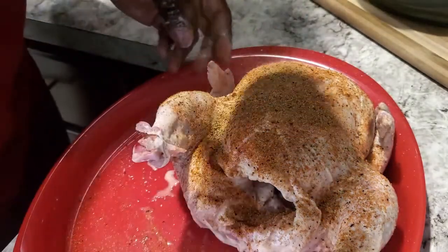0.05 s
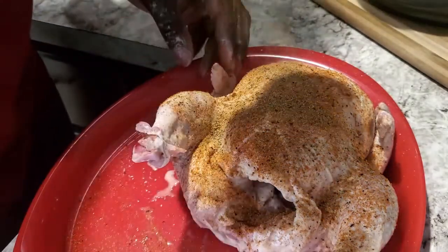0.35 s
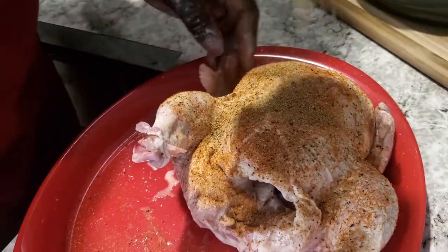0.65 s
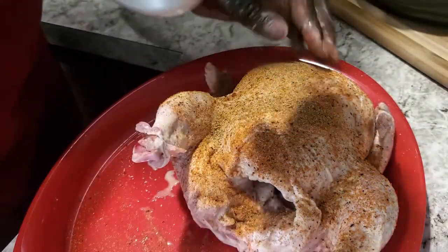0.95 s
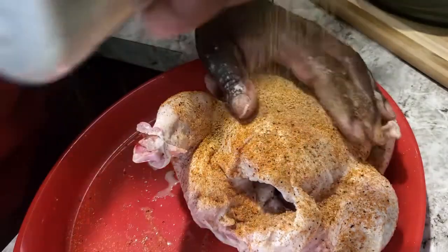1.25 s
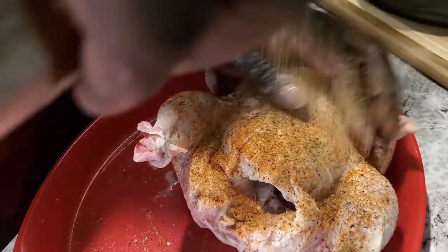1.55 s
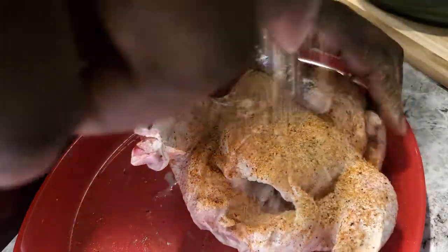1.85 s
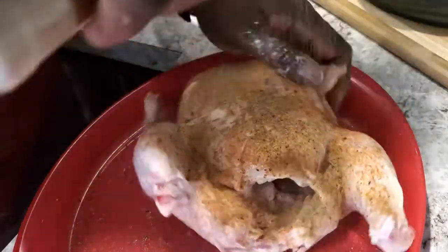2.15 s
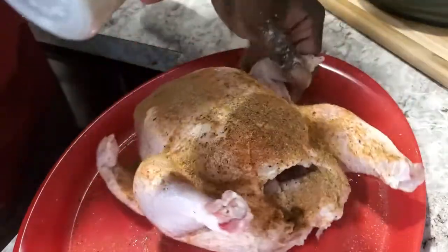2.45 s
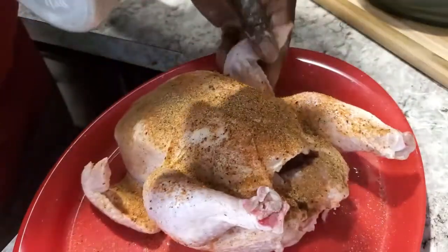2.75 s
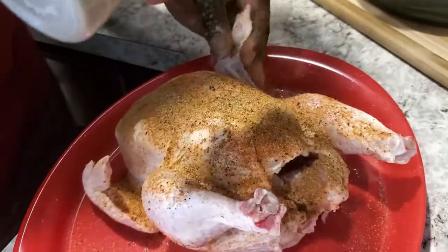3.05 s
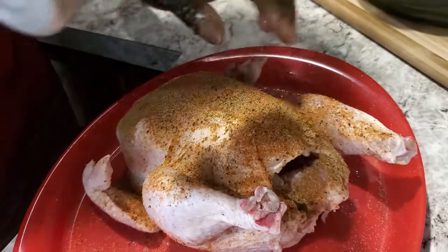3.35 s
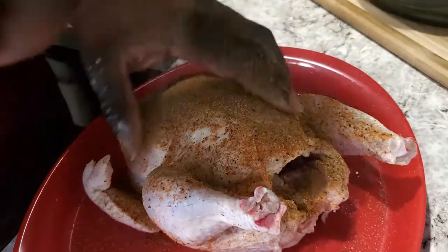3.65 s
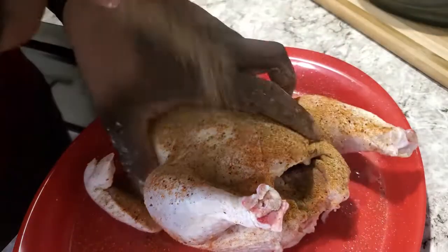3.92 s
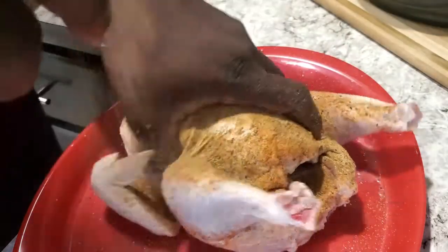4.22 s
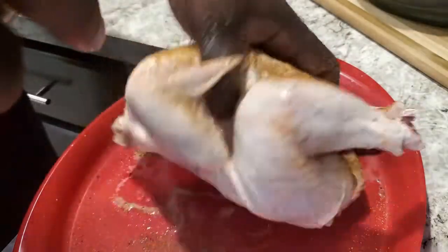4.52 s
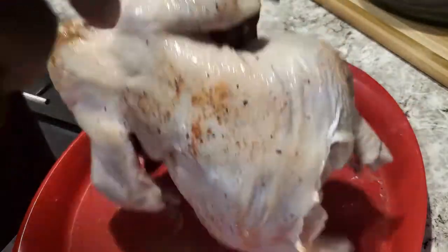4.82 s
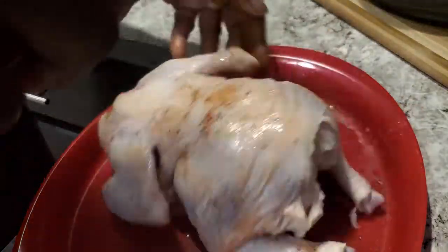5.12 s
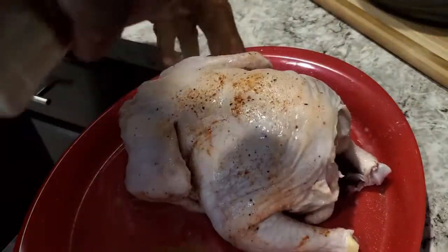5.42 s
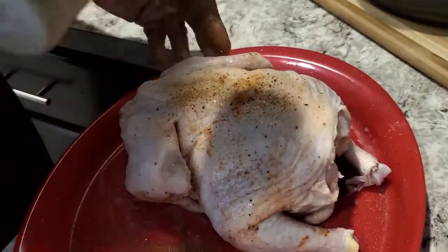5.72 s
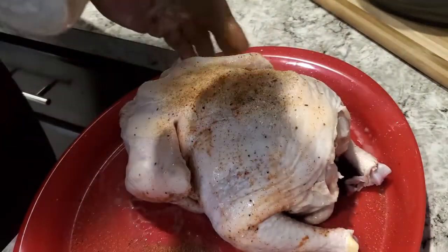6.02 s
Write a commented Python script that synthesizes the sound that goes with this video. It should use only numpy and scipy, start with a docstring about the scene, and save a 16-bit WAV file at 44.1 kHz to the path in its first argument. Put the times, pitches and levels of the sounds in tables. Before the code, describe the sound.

Seasoning patters faintly and sticky skin crackles as a raw chicken is handled and flipped with a clatter on a plastic plate.

```python
"""In a kitchen, a raw chicken is seasoned and handled on a plastic plate, close by, while a fan drones.
Falling grains patter; the wet skin crackles and snaps as it peels from the fingers, and juice smacks.
Nudged and dragged, the bird rubs and squeaks by stick-slip friction. When it is turned over,
the plate clatters on the counter and the flesh lands in soft thuds that excite the plate's low modes."""
import sys
import numpy as np
from scipy import signal
from scipy.fft import rfft, irfft, next_fast_len
from scipy.io import wavfile
from scipy.ndimage import map_coordinates

SR = 44100
rng = np.random.default_rng(int(sys.argv[2]) if len(sys.argv) > 2 else 0)


def unload_wav(signal):
    """Save mono or channel-first audio to the path in sys.argv[1] as 16-bit WAV at rate SR, clipped to [-1, 1]."""
    wavfile.write(
        sys.argv[1],
        SR,
        np.round(np.clip(np.atleast_2d(signal).T, -1, 1) * 32767).astype(np.int16),
    )


N = 276616

# spectra of fine, crisp ticks and of coarser, wet ones: (frequency [Hz], relative level [dB])
CRACKLE_SPECTRUM = [(3000, -55), (7000, -28), (9000, -17), (11000, -4.5), (13000, -1.5), (14800, -0.5),
                    (15600, 1.5)]
SQUELCH_SPECTRUM = [(600, -30.5), (1200, -10.5), (2000, -6.5), (2900, -14), (3800, -5), (4600, -3),
                    (5300, -6), (6300, 3), (7400, 5.5), (8600, 0.5), (12000, 2.5)]


def amp(db):
    """Decibels to amplitude gain."""
    return 10 ** (np.asarray(db) / 20)


def unit(x):
    """x normalised to rms 1."""
    return x / np.sqrt(np.mean(x ** 2) + 1e-20)


def along(points, hz):
    """Interpolation of (frequency [Hz], value) points on a log frequency axis."""
    f, v = np.transpose(points)
    return np.interp(np.log(hz + 1), np.log(f + 1), v)


def wobble(rate):
    """Smooth random modulation, with rate knots a second."""
    return map_coordinates(rng.standard_normal(int(N * rate / SR) + 4), [np.arange(N) * rate / SR])


def filtered(x, response):
    """Zero-phase filtering: the spectrum of x times a frequency response."""
    size = next_fast_len(N + SR // 2)
    return irfft(rfft(x, size) * response(np.fft.rfftfreq(size, 1 / SR)), size)[..., :N]


def coloured(x, spectrum, size=4096):
    """Minimum-phase filtering: folding the cepstrum gives a causal response with this spectrum."""
    cepstrum = irfft(np.log(amp(along(spectrum, np.fft.rfftfreq(size, 1 / SR)))))
    cepstrum[1:size // 2] *= 2
    cepstrum[size // 2 + 1:] = 0
    return signal.fftconvolve(x, irfft(np.exp(rfft(cepstrum)))[None], axes=1)[:, :x.shape[1]]


def shifting(x, depth_db, width_hz, hold_s):
    """Spectral modulation: the colour of x drifts at random."""
    hz, t, spectra = signal.stft(x, SR, nperseg=256)
    place = np.array(np.meshgrid(hz / width_hz, t / hold_s, indexing="ij"))
    drift = map_coordinates(rng.standard_normal((128, 640)), place)
    return signal.istft(spectra * amp(depth_db * drift), SR, nperseg=256)[1][:, :N]


def pan(db):
    """Left and right gains for a level difference."""
    return amp(np.array([[db], [-db]]) / 2)


def add(track, s, sound):
    """Superpose a sound on the track at s seconds."""
    part = track[:, round(s * SR):][:, :sound.shape[-1]]
    part += sound[..., :part.shape[1]]


def ring(modes, t, ratio, scatter_db):
    """Free vibration: damped modes whose strengths vary with each blow and each channel."""
    scatter = lambda: scatter_db * (rng.standard_normal() + rng.standard_normal((2, 1))) / 2
    return sum(amp(db + scatter() - 60 * t / t60) * np.sin(2 * np.pi * hz * ratio * t)
               for hz, db, t60 in modes)


def grains(rate, spread_db, clump_db):
    """Shot noise: impulses of random size, in clumps, at rms 1."""
    size = amp(spread_db * np.minimum(rng.exponential(size=N), 4) + clump_db * wobble(70))
    return unit((rng.random(N) < rate / SR) * size * rng.standard_normal((2, N)))


def stroke(s, length, attack_s, slope_db_per_s, release_t60):
    """Envelope of a hand movement: a linear rise, a gentle slope, then exponential decay."""
    t = np.maximum(np.arange(N) / SR - s, 0)
    release_db = -60 * np.maximum(t - length, 0) / release_t60
    return np.minimum(t / attack_s, 1) * amp(slope_db_per_s * t + release_db)


def kitchen(x, wet_db):
    """Reverberation: counter and walls add a diffuse tail whose treble dies first."""
    # room decay: (frequency [Hz], t60 [s])
    decay = [(120, 0.41), (400, 0.27), (1500, 0.26), (5000, 0.24), (15000, 0.15)]
    hz, t, spectra = signal.stft(rng.standard_normal((2, SR // 2)), SR, nperseg=256)
    tail = signal.istft(spectra * amp(-60 * t / along(decay, hz)[:, None]), SR, nperseg=256)[1]
    tail *= 1 - np.exp(-np.arange(tail.shape[1]) / SR / 0.0042)
    return x + amp(wet_db) * signal.fftconvolve(x, tail / np.linalg.norm(tail[0]), axes=1)[:, :N]


def fan():
    """Flow noise: a low rush of air, partly coherent between channels, with phase-modulated tones."""
    # air spectrum and hum tones: (frequency [Hz], relative level [dB])
    air = [(20, -15), (65, -3.5), (140, -9.5), (188, -3.5), (260, -8.5), (360, -4), (480, -10),
           (640, -18.5), (740, -16), (850, -24), (1200, -36), (2300, -37.5), (9000, -55.5), (16000, -54)]
    hum = [(75.4, -77.5), (118.4, -71), (183.0, -73.5), (312.2, -76), (506.0, -77.5), (737.5, -73.5)]
    # likeness of left and right: (frequency [Hz], correlation [-1..1])
    correlation = [(60, .8), (130, .76), (290, -.1), (640, .4), (1400, 0)]
    angle = lambda hz: np.arccos(np.clip(along(correlation, hz), -1, 1)) / 2
    response = lambda hz: amp(along(air, hz)) * [np.cos(angle(hz)), np.sin(angle(hz))]
    mid, side = filtered(rng.standard_normal((2, N)), response)
    t = np.arange(N) / SR
    tones = sum(amp(db) * np.sin(2 * np.pi * hz * t + 1.29 * wobble(8.6)) for hz, db in hum)
    return amp(-60.5) * unit(np.array([mid + side, mid - side])) + amp(2.5) * tones


def rim_taps():
    """Modal excitation: fingertips brush the rim and set it ringing faintly."""
    # touches: (time [s], peak level [dB])
    touches = [(5.915, -72.5), (6.008, -66.5), (6.03, -71), (6.178, -69.5)]
    # rim modes: (nominal frequency [Hz], relative level [dB], t60 [s])
    modes = [(2110, -10, 0.031), (2280, 2, 0.038), (2960, -12.5, .08), (3740, -9, 0.053)]
    out, t = np.zeros((2, N)), np.arange(SR // 6) / SR
    contact_s = 0.0036
    for s, db in touches:
        force = unit(rng.standard_normal((1, len(t)))) * t / contact_s * np.exp(-t / contact_s)
        rim = signal.fftconvolve(ring(modes, t, ratio=0.99, scatter_db=8), force, axes=1)[:, :len(t)]
        add(out, s, amp(db) * rim / abs(rim).max())
    return kitchen(out, wet_db=-2.5)


def seasoning():
    """Random impacts: many fine grains and a few coarse ones patter on skin and plate."""
    # flow of seasoning: (time [s], level [dB])
    flow = [(0, -55.5), (.2, -53.5), (.72, -60), (1.1, -65), (1.5, -56.5), (2.0, -49.5), (2.3, -57),
            (2.55, -60), (3.1, -60), (3.65, -64), (4.05, -58.5), (4.45, -51.5), (4.8, -56.5), (5.2, -56.5),
            (5.45, -80.5), (5.95, -72.5), (6.25, -63.5)]
    gain = amp(np.interp(np.arange(N) / SR, *np.transpose(flow)))
    ticks = grains(rate=510, spread_db=2.5, clump_db=6.0)
    patter = unit(coloured(ticks, CRACKLE_SPECTRUM))
    patter += amp(-16.5) * unit(coloured(ticks, SQUELCH_SPECTRUM))
    return kitchen(patter * gain, wet_db=2.5)


def handling():
    """Envelopes of crackle and squelch: the strongest press rules, over a faint resting level."""
    # finger presses: (time [s], duration [s], relative crackle level [dB], squelch offset [dB])
    presses = [(0.039, .09, -50.5, -7), (0.163, .18, -53, -4.5), (0.396, 0.074, -50.5, -8),
               (0.55, 0.24, -53.5, -9), (.76, 0.043, -53.5, -6.5), (0.905, 0.1, -54.5, -6),
               (1.104, 0.042, -54.5, -13.5), (1.249, 0.2, -56, -13), (1.5, 0.44, -60.5, -12),
               (1.902, 0.16, -55, -7.5), (2.094, 0.13, -51.5, -8.5), (2.26, 0.1, -55, -10),
               (2.791, 0.12, -57, -16.5), (2.98, 0.03, -55, -15), (3.12, 0.066, -59.5, -11),
               (3.785, .09, -59, -11.5), (3.863, 0.14, -58.5, -5), (4.103, 0.1, -51, -9),
               (4.25, 0.42, -50, -6.5), (4.719, 0.27, -52, -17), (4.876, 0.067, -45.5, -7.5),
               (4.924, 0.033, -38, -6.5), (5.132, .11, -49.5, -9), (5.996, 0.14, -59, -17)]
    held_db, lying_db, let_go_s = -67, -71, 4.6
    crackle = amp(np.where(np.arange(N) / SR < let_go_s, held_db, lying_db))
    squelch = crackle * amp(-33.5)
    for s, length, db, squelch_db in presses:
        press = amp(db) * stroke(s, length, attack_s=0.0063, slope_db_per_s=-13, release_t60=0.25)
        crackle = np.maximum(crackle, press)
        squelch = np.maximum(squelch, press * amp(squelch_db))
    return crackle, squelch


def wet_skin(crackle_gain, squelch_gain):
    """Adhesion: skin sticks and parts in a crackle, over a squelch of pockets opening and closing."""
    ruptures = grains(rate=3800, spread_db=1.0, clump_db=6.0)
    crackle = unit(coloured(ruptures, CRACKLE_SPECTRUM)) * crackle_gain * amp(4.5)
    pockets = coloured(grains(rate=1500, spread_db=1.0, clump_db=1.5), SQUELCH_SPECTRUM)
    squelch = unit(shifting(pockets, depth_db=2.5, width_hz=560, hold_s=0.034)) * squelch_gain
    return kitchen(crackle + squelch, wet_db=-1.5)


def smacks():
    """Squeeze flow: flesh expels air and juice in a dying spray, band-filtered by the gap."""
    # squeezes: (time [s], level [dB], gap pitch [Hz], t60 [s])
    squeezes = [(0.084, -69, 2200, 0.19), (0.171, -62.5, 1400, 0.058), (.26, -70, 2040, 0.13),
                (1.27, -73.5, 2700, 0.28), (1.791, -65.5, 1590, 0.1), (2.307, -57.5, 4400, 0.052),
                (2.34, -55, 3600, 0.033), (2.4, -52.5, 2800, 0.056), (2.991, -70, 1460, .15),
                (3.188, -75, 4200, 0.052), (3.878, -53.5, 4170, 0.068), (4.284, -56, 3800, 0.37),
                (4.33, -60, 830, 0.072), (4.363, -55, 1540, 0.043), (4.368, -51.5, 3570, .05),
                (4.46, -53.5, 2900, 0.091), (4.51, -62.5, 4200, 0.49), (4.781, -52.5, 4240, 0.026),
                (4.821, -66.5, 4400, 0.25), (4.897, -41, 1103, 0.28), (4.922, -37, 3306, 0.073),
                (4.9403, -25.5, 3000, 0.041), (4.951, -32.5, 1550, 0.062), (4.9425, -29, 4100, 0.044),
                (4.976, -37.5, 3820, 0.045), (5.115, -49, 2000, 0.053), (5.134, -29.5, 560, 0.045),
                (5.151, -38, 2850, 0.032)]
    out, t = np.zeros((2, N)), np.arange(SR // 5) / SR
    spray = grains(rate=6300, spread_db=-2.5, clump_db=-1.5)
    for s, db, hz, t60 in squeezes:
        gap = signal.butter(1, [hz / 1.27, hz * 1.145], "band", fs=SR)
        start = rng.integers(N - len(t))
        splash = signal.lfilter(*gap, signal.lfilter(*gap, spray[:, start:start + len(t)]))
        swell = 1 - np.exp(-t / (0.024 * t60))  # a slower squeeze starts more softly
        add(out, s, unit(splash) * swell * amp(db - 60 * t / t60))
    return kitchen(out, wet_db=-3.5)


def drag():
    """Stick-slip friction: the sliding bird rubs, rumbles the plate and squeaks briefly."""
    # shoves: (time [s], duration [s], relative rub level [dB], relative rumble level [dB])
    shoves = [(1.916, 0.26, -65.5, -59), (4.124, 0.043, -70, -55.5), (4.279, 0.088, -60.5, -54),
              (4.423, .25, -66.5, -55), (4.7, 0.21, -68, -56.5), (4.878, 0.039, -49, -44)]
    # friction spectra: (frequency [Hz], relative level [dB])
    rub_spectrum = [(200, -2.5), (400, 6.5), (700, 6), (1100, -4), (1600, -5), (2600, -12), (4000, -9.5),
                    (8000, -26.5)]
    rumble_spectrum = [(20, -16), (40, 1), (75, 3), (150, 1), (300, -12.5), (600, -39)]
    # wet skin on plastic: (time [s], level [dB], starting pitch [Hz], duration [s])
    squeaks = [(4.314, -49, 612, .02), (4.326, -48, 670, 0.014), (4.337, -43, 764, 0.0083),
               (4.357, -53, 910, 0.013)]
    rub_gain, rumble_gain = sum(
        amp([[rub_db], [rumble_db]])
        * stroke(s, length, attack_s=0.044, slope_db_per_s=3.5, release_t60=0.33)
        for s, length, rub_db, rumble_db in shoves)
    slips = coloured(grains(rate=1000, spread_db=0.5, clump_db=0.5), rub_spectrum)
    out = unit(shifting(slips, depth_db=5, width_hz=280, hold_s=0.02)) * rub_gain * amp(2.5)
    out += unit(coloured(rng.standard_normal((1, N)), rumble_spectrum)) * rumble_gain * amp(-3.5)
    t = np.arange(SR // 10) / SR
    for s, db, hz, length in squeaks:
        swell = t / length * 4
        pitch = hz * (1 + 0.037 * np.minimum(t / length, 2))
        tone = np.sin(2 * np.pi * np.cumsum(pitch) / SR)
        add(out, s - length / 4, amp(db) * swell * np.exp(1 - swell) * tone)
    return kitchen(out, wet_db=-4.5)


def snaps(crackle_gain):
    """Adhesive failure: patches of skin peel off in bursts, crisp when quick and soft when slow."""
    # patches letting go: (time [s], peak level [dB], body offset [dB], peeling time [s])
    patches = [(.052, -32, -10, 0.00072), (.081, -25, -11.5, 0.0013), (.22, -31, -5.5, 0.00048),
               (.275, -30, -11, .002), (.393, -28, -10.5, 0.00069), (.435, -33.5, -4, 0.0025),
               (.567, -32, -7, 0.00066), (.632, -32, -8.5, 0.0013), (.773, -31, -10, 0.0012),
               (.815, -33.5, -5.5, 0.0025), (.919, -29.5, -11.5, 0.003), (.935, -34, -8, 0.0015),
               (1.026, -37.5, -6, 0.0016), (1.16, -35, -9.5, 0.0027), (1.337, -31.5, -15, 0.0011),
               (1.58, -28, -14.5, 0.0012), (1.8, -31, -12.5, 0.00047), (1.995, -29.5, -8.5, 0.00053),
               (2.109, -19, -12, 0.00076), (2.188, -37.5, 10.5, 0.00066), (2.6763, -20, -15, 0.00057),
               (2.842, -32, -19.5, .0008), (2.868, -36, -14.5, 0.00033), (2.924, -29, -16.5, 0.00038),
               (2.9601, -21.5, -13, 0.00013), (2.99, -31, -5.5, 0.0012), (3.124, -36, -24, 0.00069),
               (3.152, -33, -21.5, .001), (3.202, -31, -16, 0.00056), (3.494, -29, -15.5, .0005),
               (3.567, -34, -16, .0005), (3.7494, -28, -18, 0.00026), (3.881, -26, -10.5, 0.0016),
               (4.081, -28.5, -17.5, 0.00057), (4.2675, -29.5, -10.5, .0015), (4.292, -27.5, -8, .001),
               (4.356, -33.5, -1, 0.0014), (4.52, -30.5, -8.5, 0.0008), (4.607, -32, -9, 0.0013),
               (4.79, -36.5, -7, .002), (4.869, -26, -14, .0007), (4.9424, -15, -13, 0.00063),
               (4.9554, -24, -10.5, 0.0012), (4.9751, -26.5, -11, 0.0017), (5.1334, -23, -14, 0.00063),
               (5.4261, -44, -15.5, .0005), (5.776, -42.5, -19, 0.00048), (5.82, -35, -20, 0.00057),
               (6.143, -39.5, -17, .0007), (6.213, -37, -16, 0.00073)]
    # a snap's lower body: (frequency [Hz], relative level [dB])
    body_spectrum = [(600, -29), (1500, -14.5), (2900, -19), (3800, -12), (5300, -7), (6300, -1), (7500, 2),
                     (8700, 0), (12000, -1.5)]
    out, t = np.zeros((2, N)), np.arange(SR // 20) / SR
    # fainter snaps come at random and grow with the crackle around them
    faint_per_s, faint_body_db, faint_peel_s = 20, -17, 0.00017
    activity = (crackle_gain / np.median(crackle_gain)) ** 0.82
    faint_db = -44 + 20 * np.log10(activity) + 4.5 * rng.standard_normal(N)
    onsets = np.flatnonzero(rng.random(N) < faint_per_s / SR)
    faint = [(i / SR, faint_db[i], faint_body_db, faint_peel_s) for i in onsets]
    tail = amp(-18.5 - 60 * t / 0.024)  # the skin peels a little further
    for s, db, body_db, peel_s in patches + faint:
        peel = t / peel_s * np.exp(1 - t / peel_s) + tail
        burst = rng.standard_normal((2, len(t))) * peel
        high, body = coloured(burst, CRACKLE_SPECTRUM), coloured(burst, body_spectrum)
        snap = high / abs(high).max() + amp(body_db) * body / abs(body).max()
        add(out, s, amp(db) * snap * pan(-0.5 * rng.standard_normal()))
    return kitchen(out, wet_db=-5.0)


def thuds():
    """Mass-loaded vibration: soft, heavy contacts bounce the flexing plate under the bird's weight."""
    # landings: (time [s], peak level [dB], pitch [ratio], contact time [s], damping [ratio])
    landings = [(1.932, -48.5, 1.45, 0.0021, 1.5), (2.101, -40.5, 1.71, 0.0035, 2.8),
                (2.345, -49, 1.48, 0.0052, 0.43), (4.658, -28, 1.034, 0.0078, 0.94),
                (4.705, -43, 2.05, 0.0059, 0.97), (4.9234, -25, 1.42, 0.0018, 1.2),
                (4.947, -24.5, 0.79, 0.0064, 0.96), (4.99, -29.5, 1.17, 0.0034, 1.6),
                (5.1344, -15.5, 1.0, 0.0017, 1.2), (5.175, -28.5, 2.4, 0.0043, 1.4),
                (5.218, -27.5, 1.07, .016, 1.7), (5.266, -37.5, 1.2, 0.014, 2.2)]
    # loaded plate: (nominal frequency [Hz], relative level [dB], nominal t60 [s])
    modes = [(138.4, 2, .16), (189.6, -10.5, 0.15), (251, 1.5, .035), (281, -3, 0.048), (314.6, -2.5, 0.17),
             (364, -3.5, 0.092), (536, -11, 0.16)]
    out, t = np.zeros((2, N)), np.arange(SR // 3) / SR
    low_cut = signal.butter(3, 112, "high", fs=SR)  # a high-pass keeps deep bass out of the thuds
    for s, db, ratio, contact_s, damping in landings:
        force = t * np.exp(-6 * t / contact_s)
        settle = np.exp(-(t * damping / 0.18) ** 2)  # spreading flesh smothers the bounce
        response = ring(modes, t * damping, ratio / damping, scatter_db=1.5) * settle
        bounce = signal.lfilter(*low_cut, signal.fftconvolve(response, force[None], axes=1))
        add(out, s, amp(db) * bounce / abs(bounce).max())
    return kitchen(out, wet_db=-13.0)


def plate_knocks():
    """Hard impact: the plate rocks on the counter, cracking and ringing, duller when flesh cushions it."""
    # blows: (time [s], peak level [dB], cutoff [Hz], hollow pitch [Hz], hollow offset [dB],
    # ring offset [dB], left minus right [dB])
    blows = [(1.926, -46, 2520, 588, -4, -5.5, 5.5), (2.089, -39, 3820, 1150, -14, -5.5, 1.5),
             (2.333, -43.5, 4200, 1140, -9, -6, 2), (2.3405, -30.5, 3500, 1175, -7.5, -28, -2),
             (2.349, -42, 2600, 1060, -11, -20, 2), (2.4, -34, 2080, 610, -9.5, -27, 3),
             (2.402, -38, 1800, 1157, -2, -35, 10), (4.597, -44, 4000, 1371, -22, -4, 6.5),
             (4.658, -43, 1212, 700, -8, -9, 3.5), (4.921, -20, 2623, 652, -11.5, -7.5, -1),
             (4.928, -22, 1533, 591, -10, -10.5, 1), (4.941, -8, 3927, 1417, -7.5, -5.5, -1),
             (4.9477, -19, 3300, 860, -8, -7.5, 3), (4.954, -20.5, 2830, 1408, -7, -9, 8.5),
             (4.967, -27.5, 2006, 373.6, -5, -8, 3.5), (5.133, -18, 1667, 912, -14.5, -16, -4.5),
             (5.1425, -27.5, 1800, 1027, -11, -17, 4), (5.149, -25.5, 1830, 1081, -5.5, -11.5, 7.5),
             (5.2125, -24.5, 2500, 1305, -10, -15.5, 1)]
    # plate modes: (frequency [Hz], relative level [dB], t60 [s])
    modes = [(319, -5, .2), (385, -9, .12), (540, -9, .11), (670, -7, .11), (855, -5, .13), (952, -4, .12),
             (1026, -4, .14), (1168, -7, .09), (1265, -4, .1), (1395, 0, .12), (1485, -2, .1),
             (1560, 0, .12), (1730, -4, .13), (2060, -7, .12), (2290, -4, .11), (2440, -4, .11),
             (2915, -6, .09), (3467, -8, .09), (3975, -4, .09), (4660, -6, .08)]
    # contact noise: (frequency [Hz], relative level [dB])
    crack_spectrum = [(100, -17), (400, 9), (1400, 8.5), (4000, 1), (8000, 7), (15000, 2)]
    attack_s, crack_t60, hollow_t60 = 0.00039, 0.032, 0.025
    out, t = np.zeros((2, N)), np.arange(SR // 4) / SR
    for s, db, cutoff_hz, hollow_hz, hollow_db, ring_db, side_db in blows:
        crack = coloured(rng.standard_normal((2, len(t))) * amp(-60 * t / crack_t60), crack_spectrum)
        # the hollow pitch depends on where the weight bears
        hollow = np.sin(2 * np.pi * hollow_hz * t) * amp(-60 * t / hollow_t60)
        ringing = ring(modes, t, ratio=1, scatter_db=6.5)
        blow = unit(crack) + amp(ring_db) * unit(ringing) + amp(hollow_db) * unit(hollow)
        blow *= 1 - np.exp(-t / attack_s)
        blow = signal.lfilter(*signal.butter(2, cutoff_hz, fs=SR), blow) + amp(-40.0) * blow
        add(out, s, amp(db) * blow / abs(blow).max() * pan(side_db))
    return kitchen(out, wet_db=-6.5)


def scene():
    """Superposition of all sources; the same presses drive crackle, squelch and faint snaps."""
    crackle_gain, squelch_gain = handling()
    return (wet_skin(crackle_gain, squelch_gain) + seasoning() + smacks() + drag()
            + plate_knocks() + rim_taps() + thuds() + fan() + snaps(crackle_gain))


def record(dry):
    """Frequency response: each of two microphones adds its own colour, up to a band limit."""
    # microphone imbalance: (frequency [Hz], left minus right [dB])
    imbalance = [(50, 6.5), (125, 2.5), (220, 10), (380, 4), (600, -4), (800, -2.5), (1200, 1.5),
                 (2400, -2), (4400, 9.5), (7200, 9.5), (8800, 0), (14000, 2.5)]
    top_hz = 15850
    return filtered(dry, lambda hz: amp(np.outer([.5, -.5], along(imbalance, hz))) * (hz < top_hz))


dry = scene()
out = record(dry)
unload_wav(out)
```